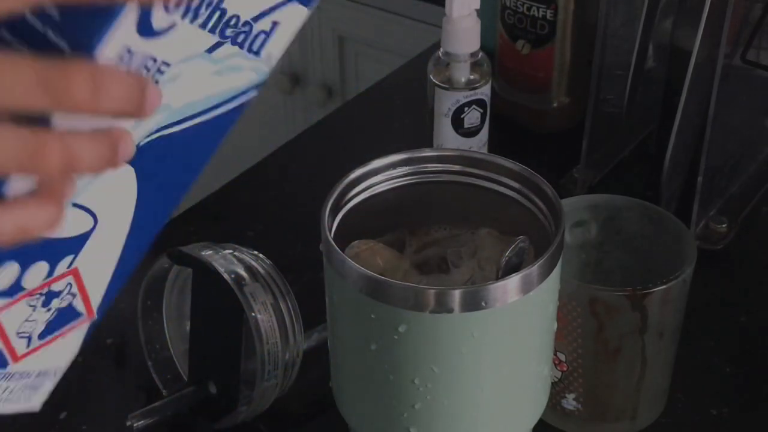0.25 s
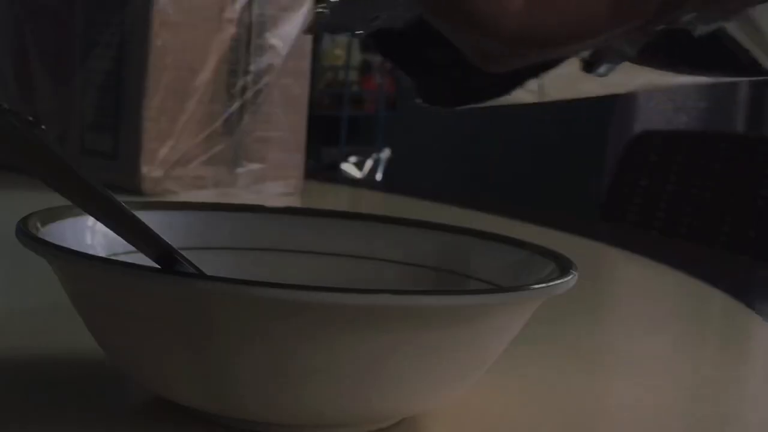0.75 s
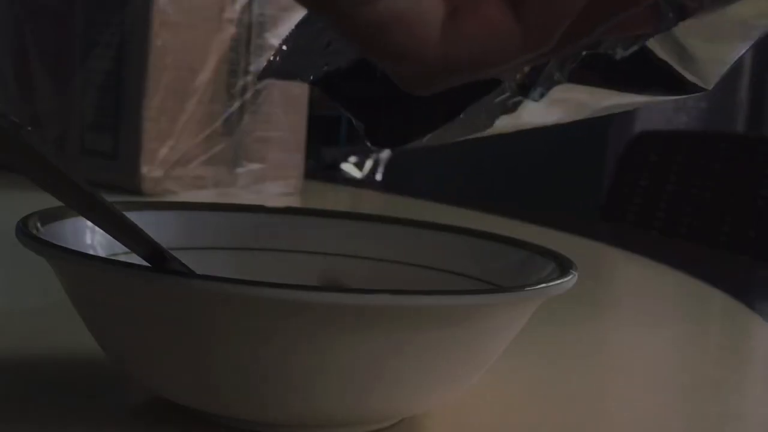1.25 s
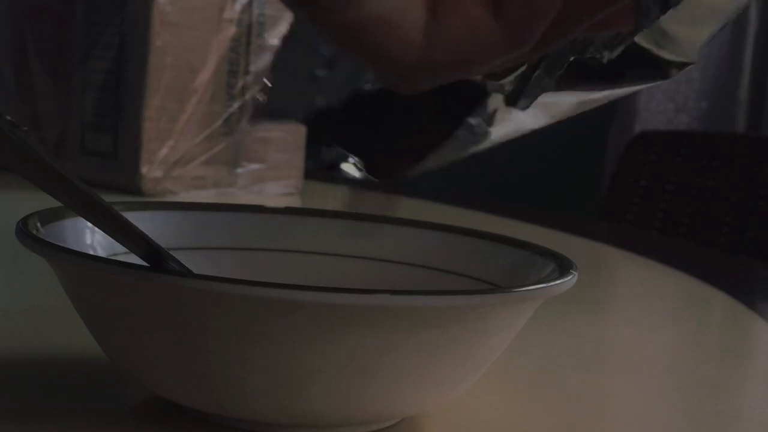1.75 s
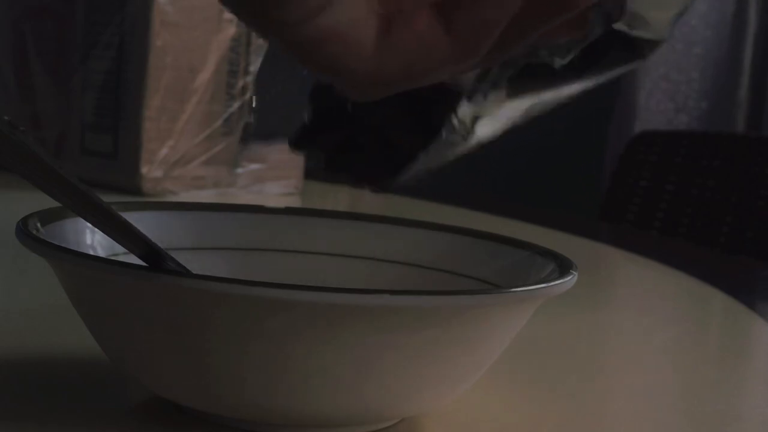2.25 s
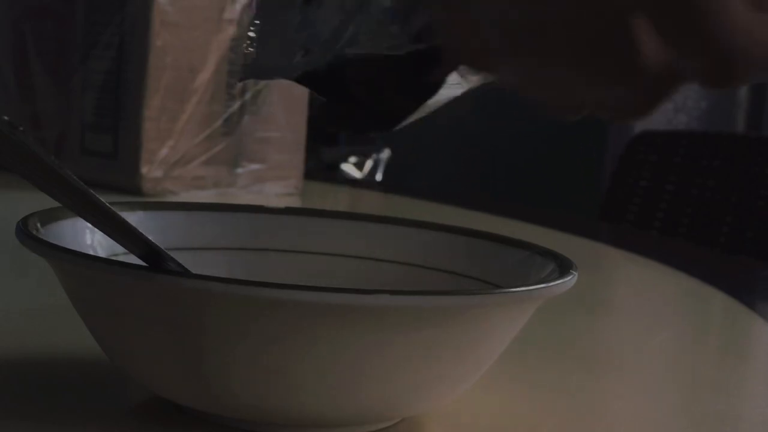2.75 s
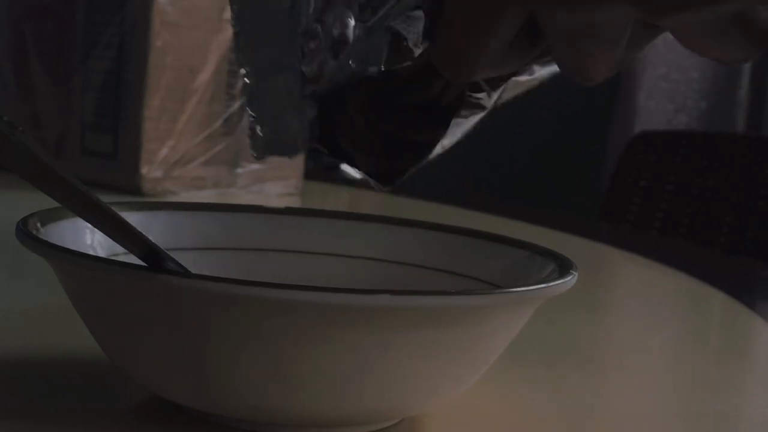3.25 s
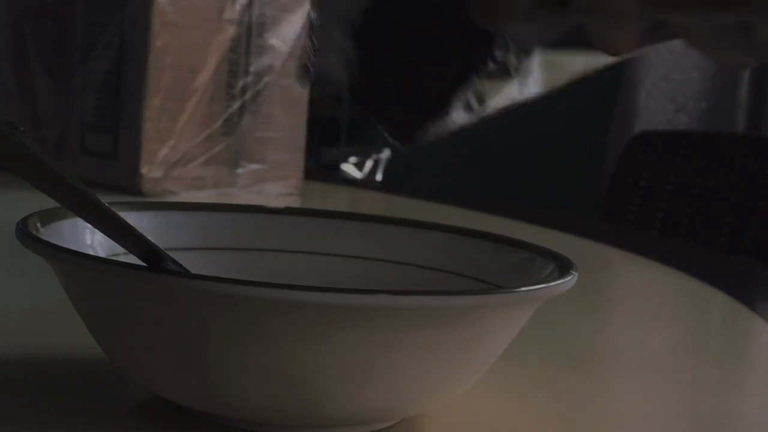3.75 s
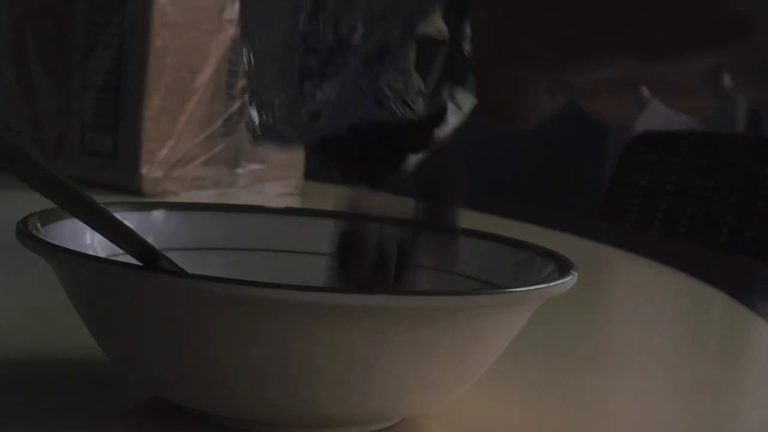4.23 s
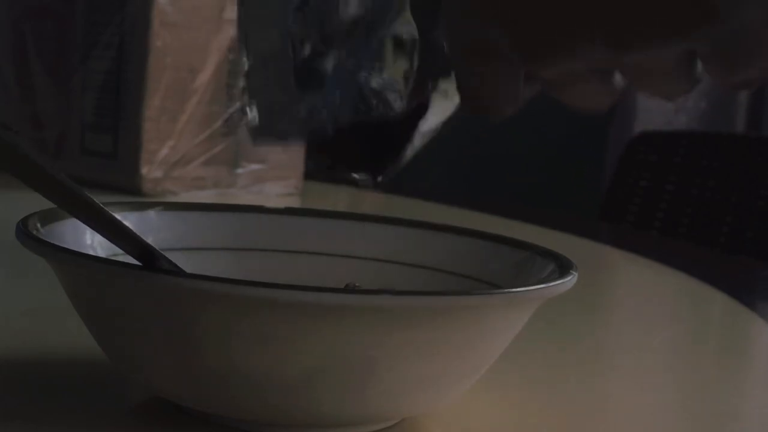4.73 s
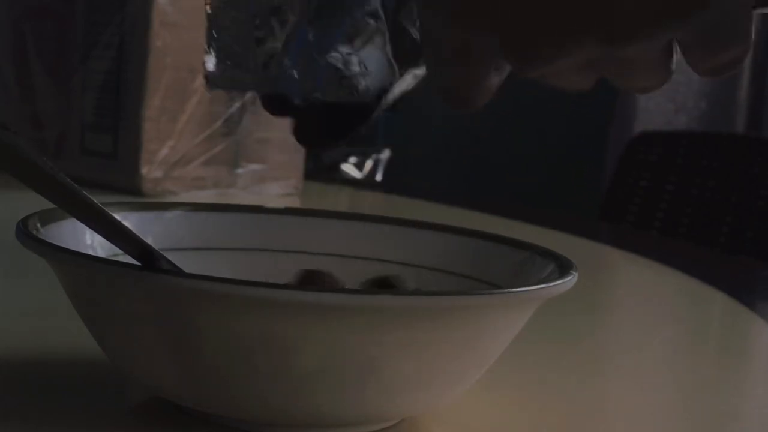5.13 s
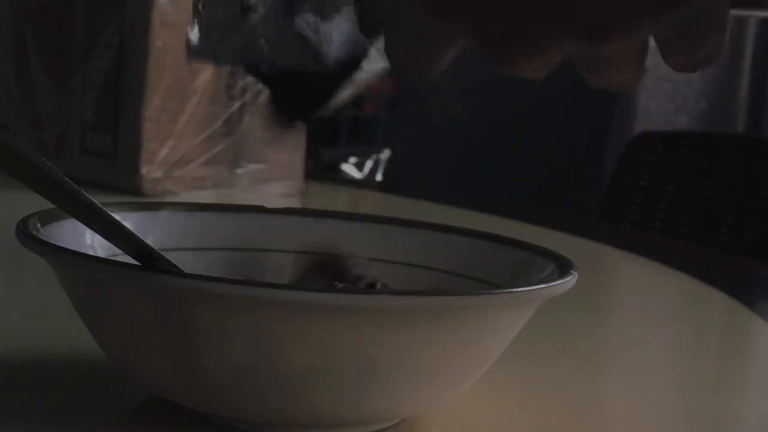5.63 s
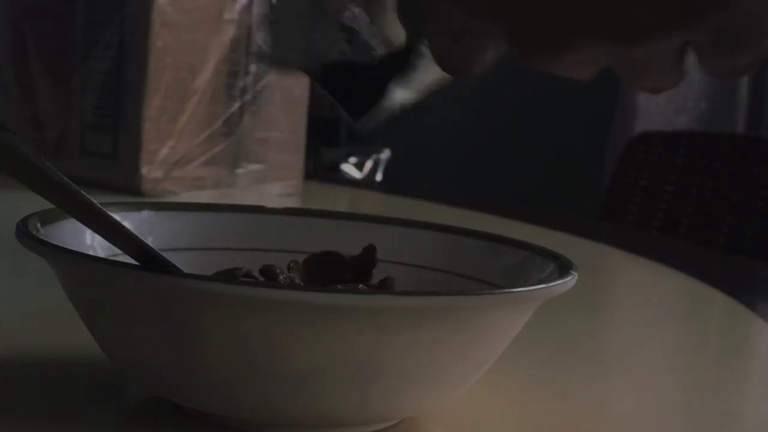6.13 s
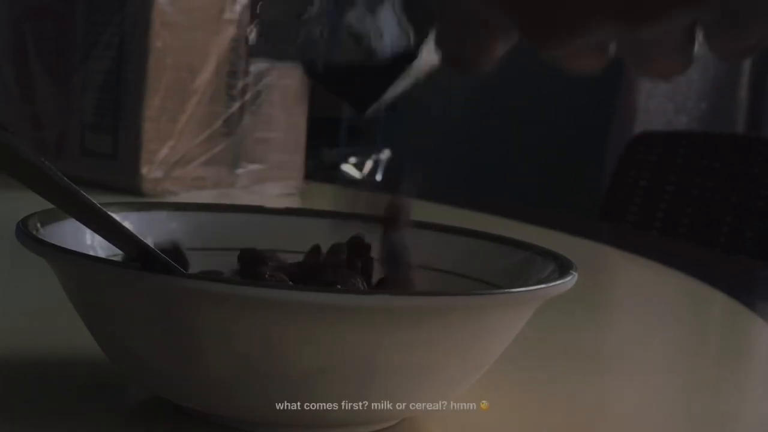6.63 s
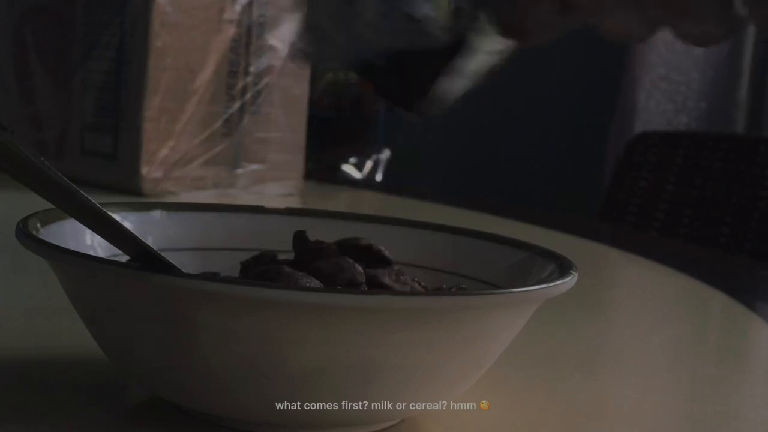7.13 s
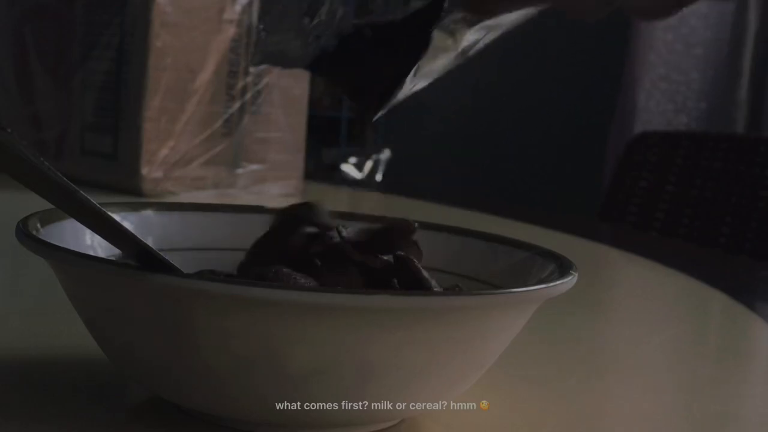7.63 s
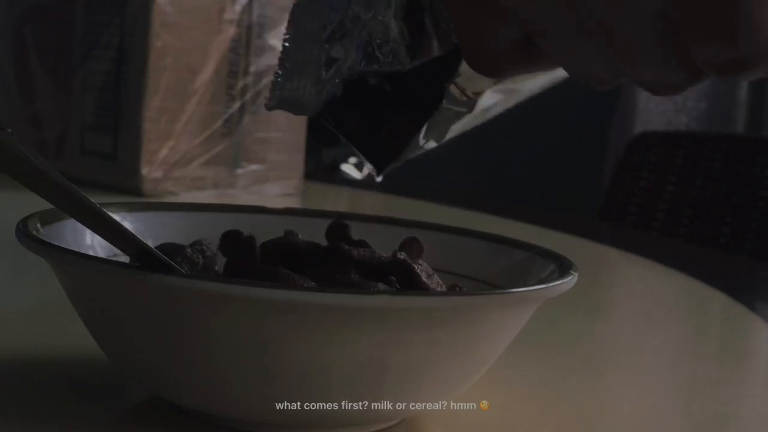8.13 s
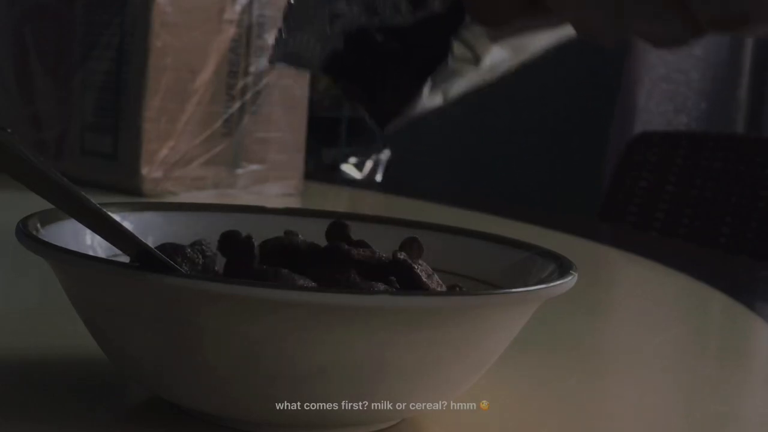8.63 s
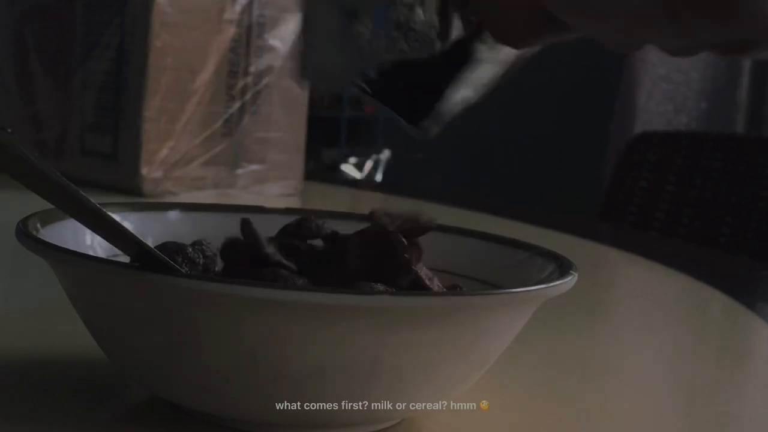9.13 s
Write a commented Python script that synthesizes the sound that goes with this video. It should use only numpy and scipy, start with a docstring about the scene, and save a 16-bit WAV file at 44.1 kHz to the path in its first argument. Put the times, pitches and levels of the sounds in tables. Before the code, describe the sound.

A container knock and small ticks on a counter open the scene. Dry cereal then clatters into an empty ceramic bowl in a short bright burst, followed by loud crinkling of the foil bag with few flakes. A longer, shaken pour follows, rattling onto a growing heap while the bowl's faint chime fades. It ends with faint bag creaks and a few last flakes. Very close microphone, small room, low hum.

```python
"""A knock and a few ticks on the counter, then dry cereal is shaken from a crinkly bag into a ceramic bowl.
Heard close by in a small humming room: flakes and creases are noise bursts, each with its own short ring.
Sliding flakes and the flexing bag are filtered noise contacts whose levels follow the shakes.
The bowl is a set of resonances driven by the flakes and the load; its faint chime weakens as the heap grows."""
import sys
import numpy as np
from scipy import signal
from scipy.fft import rfft, irfft
from scipy.io import wavfile
from scipy.ndimage import uniform_filter1d

SR = 44100
rng = np.random.default_rng(int(sys.argv[2]) if len(sys.argv) > 2 else 0)


def to_wav(s):
    """Save 16-bit WAV."""
    ch = np.atleast_2d(s).T  # columns
    pcm = np.round(np.clip(ch, -1, 1) * 32767)  # PCM
    wavfile.write(sys.argv[1], SR, pcm.astype(np.int16))


N = 413658
T = np.arange(N) / SR

# colour of the hollow body under a contact: frequency_hz, level_db
BODY_COLOUR = [(150, -20.5), (450, -17.5), (750, -5), (1050, 2.5), (1350, 5.5), (1750, -1.5), (2200, -5),
               (3000, -7.5), (5000, -48.5)]
# colour of the bright edge of a contact: frequency_hz, level_db
EDGE_COLOUR = [(6000, -44.5), (9500, -11), (11300, -1.5), (13500, -3), (15800, -4)]
USUAL_RING_HZ = 5300


def undb(db):
    """Decibels to gain."""
    return np.exp(np.asarray(db) * (np.log(10) / 20))


def unit(x):
    """Scale to rms 1."""
    return x / np.sqrt(np.mean(x ** 2) + 1e-20)


def over_time(points):
    """Straight lines in dB through the given (s, dB) points."""
    return np.interp(T, *np.transpose(points))


def response(points, size=1024):
    """Causal (minimum-phase) impulse response of unit energy with the given (Hz, dB) colour."""
    hz, db = np.transpose(points)
    grid = np.maximum(np.fft.rfftfreq(size, 1 / SR), 1)
    colour_db = np.interp(np.log(grid), np.log(hz), db)
    # folding the cepstrum forward puts all the energy after the impulse
    cepstrum = irfft(np.log(undb(colour_db)))
    cepstrum[1:size // 2] *= 2
    cepstrum[size // 2 + 1:] = 0
    h = irfft(np.exp(rfft(cepstrum)))
    return h / np.linalg.norm(h)


def through(x, h):
    """Pass a sound through an impulse response."""
    return signal.oaconvolve(x, h)[:len(x)]


def resonate(x, hz, width_hz):
    """One resonance, gain 1 at its centre."""
    hz = min(hz, SR / 2 - 2000)
    return signal.lfilter(*signal.iirpeak(hz, hz / width_hz, fs=SR), x)


def walk(rate):
    """Slow chance with a spread near 1, turning at the given rate per second."""
    knots = rng.standard_normal(int(T[-1] * rate) + 2)
    return np.interp(T * rate, np.arange(len(knots)), knots)


def tones(rows, waver_db, waver_hz):
    """Sine lines, given as (Hz, dB), that waver in level and pitch."""
    total = 0
    for hz, db in rows:
        level = undb(db + waver_db * walk(2.13))
        phase = 2 * np.pi * np.cumsum(hz + waver_hz * walk(9.8)) / SR
        total = total + level * np.sqrt(2) * np.sin(phase)
    return total


def grains(rate, spread_db):
    """Random impulses, many small and a few large, evened out over a twentieth of a second."""
    chance = rng.random(N) * SR / rate
    hit = chance < 1
    x = np.zeros(N)
    x[hit] = undb(spread_db * np.minimum(-np.log(chance[hit] + 1e-12), 4))
    return x / np.sqrt(np.abs(uniform_filter1d(x ** 2, size=2205)) + 1e-6)


def patter(rate, spread_db, decay_ms, grind=0):
    """Small contacts as noise bursts; rate (per second) may move, grind is the power of steady rubbing."""
    decay = np.exp(-2000 / (SR * decay_ms))
    power = signal.lfilter([1], [1, -decay], grains(rate, spread_db) ** 2)
    return unit(np.sqrt(power + grind * power.mean()) * rng.standard_normal(N))


def strikes(rows, crack_db, body_db, edge_db, ring_db, ring_width_hz, snap, stretch, rise_ms, bounce,
            size=2048):
    """Each contact snaps, shivers and rebounds, heard as a ringing crack, a hollow body and a bright edge."""
    # colour of the crack: frequency_hz, level_db
    crack_colour = [(1200, -33.5), (2300, 0), (3200, -3.5), (4300, 6.5), (5300, 9), (6500, 7), (7700, 7),
                    (9300, 5), (10500, -6), (14000, -38)]
    edge_db_per_octave = 3  # high-ringing contacts have a brighter edge
    colour_scatter_db = 2
    out, ms = np.zeros(N + size), np.arange(size) / SR * 1000
    body, crack, edge = response(BODY_COLOUR), response(crack_colour), response(EDGE_COLOUR)
    attack = int(.006 * SR)

    def at(x, db):
        """Set the rms of the first 6 ms."""
        return x * undb(db) / np.sqrt(np.mean(x[:attack] ** 2))

    for (s, db, body_rel, hz, decay_ms), noise in zip(rows, rng.standard_normal((len(rows), size))):
        edge_rel = edge_db_per_octave * np.log2(hz / USUAL_RING_HZ) + colour_scatter_db * noise[-3]
        fade_ms = max(stretch * decay_ms, .2)
        rebound_ms = decay_ms * (0.96 + 1.2 * abs(noise[-1]))
        # a short contact is a clean snap, a long one builds up and touches again
        shape = (1 - np.exp(-ms * 3 / (rise_ms * decay_ms))) * np.exp(-ms / fade_ms)
        rebound = bounce * np.interp(ms - rebound_ms, ms, shape, left=0)
        shiver = noise * (shape + rebound)
        shiver[0] += snap / decay_ms
        ring = at(through(shiver, crack), 0) + at(resonate(shiver, hz, ring_width_hz), ring_db)
        hit = at(ring, crack_db)
        hit = hit + at(through(shiver, body), body_rel + body_db)
        hit = hit + at(through(shiver, edge), edge_rel + edge_db)
        start = max(int(s * SR), 0)
        out[start:start + size] += undb(db) * hit
    return out[:N]


def hum():
    """Room tone: coloured noise as a low rumble, a few wavering low lines and two faint whines."""
    # colour of the rumble ahead of the low cut: frequency_hz, level_db
    room_colour = [(20, -25.5), (30, 8), (38, 0.5), (57, 0), (75, -3), (95, -3), (120, 3), (150, -9),
                   (220, -13), (400, -22), (900, -29), (2500, -35.5), (6000, -42.5), (15000, -52)]
    # course of the rumble, lowered 3 dB below: time_s, level_db
    rumble_course = [(0.0, -46), (0.44, -46.5), (0.73, -38.5), (1.12, -45), (2.61, -38.5), (4.57, -48),
                     (8.36, -43.5), (9.38, -43)]
    # low lines of the hum: frequency_hz, level_db
    hum_lines = [(57, -64.5), (111, -66.5), (123.8, -66), (167, -66.5)]
    # faint whines: start_s, end_s, partials as (frequency_hz, level_db)
    whine_rows = [(.42, .64, [(470, -70), (945, -66), (1410, -70)]), (8.4, 9.0, [(937, -72), (1895, -76)])]
    whine_fade_s = 0.048
    rumble = unit(through(rng.standard_normal(N), response(room_colour, size=16384)))
    low_cut = signal.butter(10, 31, "high", fs=SR, output="sos")
    rumble = signal.sosfilt(low_cut, rumble) * undb(over_time(rumble_course) - 3.0)
    whine = 0
    for start, end, partials in whine_rows:
        fade = np.clip(np.minimum(T - start, end - T) / whine_fade_s, 0, 1)
        whine = whine + tones(partials, waver_db=2.5, waver_hz=6) * fade
    return rumble + tones(hum_lines, waver_db=3.0, waver_hz=1.48) + whine


def room(x, wet_db, t60_s, treble_t60_s, table_db, table_ms):
    """Quick scatter off bowl and table, with the short tail of the walls; treble has its own decay."""
    t = T[:SR]
    low, high, near = rng.standard_normal((3, SR))
    low = signal.lfilter(*signal.butter(2, 3500, fs=SR), low)
    high = signal.lfilter(*signal.butter(2, 3500, "high", fs=SR), high)
    tail = low * undb(-60 * t / t60_s) + high * undb(-60 * t / treble_t60_s)
    tail *= t > .006
    near *= np.exp(-t * 1000 / table_ms) * (t > .002)
    walls = undb(wet_db) * tail / np.linalg.norm(tail)
    table = undb(table_db) * near / np.linalg.norm(near)
    return x + through(x, walls + table)


def vessel():
    """A container on the counter rings out from time zero, with the first knock: decaying, wavering sines."""
    # modes of the container: frequency_hz, level_db, t60_s
    vessel_modes = [(796, -40, 0.23), (826, -39, 0.22), (1010, -57, 0.3), (1292, -61, 0.26),
                    (2150, -48, 0.27), (3025, -52, .2)]
    total = 0
    for hz, db, t60 in vessel_modes:
        fade = undb(db - 60 * np.minimum(T / t60, 3))
        total = total + fade * np.sin(2 * np.pi * hz * T + 2.1 * walk(83))
    return total


def counter_knocks():
    """Things handled on the counter: a knock and ticks with a strong, broad ring."""
    # start_s, nominal level_db, relative body_db, ring_hz, nominal decay_ms (shortened by stretch)
    knock_rows = [(.001, -35, 11, 2800, 7), (.497, -52, 5, 3600, 3), (.5137, -36, -3, 3380, 3.2),
                  (.59, -51, 6.5, 2300, 5), (.657, -37, -0.5, 4350, 2.3)]
    return strikes(knock_rows, crack_db=3.5, body_db=-3, edge_db=-7, ring_db=9.5, ring_width_hz=620,
                   snap=2.4, stretch=0.54, rise_ms=0.46, bounce=0.13)


def thumps(decay_ms, rise_ms, width_hz, size=4096):
    """Dull blows: short noise pushes, each through one broad low resonance twice."""
    # soft thumps, mostly of the load on bag wall and heap: start_s, level_db (peak, raised 9.5 dB), pitch_hz
    thump_rows = [(.004, -40, 269), (.513, -45, 330), (1.628, -45, 170), (2.584, -41, 178),
                  (2.966, -40, 600), (3.206, -36, 285), (3.267, -39, 277), (3.295, -41, 277),
                  (3.377, -39, 316), (3.767, -36, 590), (4.721, -44, 277), (5.106, -36, 614),
                  (5.624, -36.5, 540), (6.223, -39, 194), (6.727, -37.5, 387), (7.25, -46, 480)]
    out, ms = np.zeros(N + size), np.arange(size) / SR * 1000
    for (s, db, hz), noise in zip(thump_rows, rng.standard_normal((len(thump_rows), size))):
        push = noise * (1 - np.exp(-ms / rise_ms)) * np.exp(-ms / decay_ms)
        blow = resonate(resonate(push, hz, width_hz), hz, width_hz)
        start = max(int(s * SR), 0)
        out[start:start + size] += undb(db + 9.5) * blow / np.abs(blow).max()
    return out[:N]


def snapping_creases():
    """Creases of the bag snap over: brief cracks with a weak rebound."""
    # loudest creases: start_s, nominal level_db, relative body_db, ring_hz, nominal decay_ms (shortened)
    crease_rows = [(1.4715, -23, -16, 5700, 8.9), (1.572, -32.5, -16, 5800, 1.3),
                   (1.6437, -32.5, -2, 5920, 0.97), (1.787, -31.5, -6, 9900, 0.94),
                   (1.9734, -39, 6, 8100, 1.2), (2.4797, -31.5, -20, 8550, 1),
                   (2.6169, -27.5, 1.5, 6420, 1.3), (2.682, -32, 6, 3340, 2.4),
                   (2.7507, -18, -8.5, 4330, 1.8), (2.7749, -27.5, -4, 4180, 2.5),
                   (2.802, -20, -9, 9100, 3), (2.8536, -29, -4, 6200, 1.9), (3.0521, -32, -11, 4310, 1.1),
                   (3.0607, -31, -2, 8480, 1.6), (3.1505, -18, -11, 4500, 2.7),
                   (3.2081, -19.5, -16, 2980, 2.5), (3.299, -24, -2.5, 8900, 0.85),
                   (3.3797, -25, 2.5, 3730, 0.62), (3.3937, -24.5, -9.5, 4370, 2.1),
                   (3.4046, -23, -6, 6800, 3.1), (3.4793, -28.5, -20, 5070, 2.4),
                   (3.5012, -28.5, -20, 6400, 3), (3.515, -26.5, -15, 5660, 1.6),
                   (3.7228, -31.5, 7, 8760, 2.1), (3.7544, -21.5, 4, 5500, 0.94),
                   (3.7712, -20.5, 0, 4360, 1.1), (3.8911, -25, -4, 4050, 9.3),
                   (3.8965, -28, -11, 9300, .7), (4.4633, -29, -9, 10000, 1.04),
                   (4.558, -38.5, -22, 10400, 1.7), (4.6617, -36.5, 2, 5370, 3.8),
                   (4.6975, -33, -11, 4600, 11), (4.8287, -34.5, -2.5, 4500, 0.73),
                   (7.0845, -35, -12.5, 9000, .9), (7.4293, -31, -16, 7840, 1.9),
                   (8.0805, -45, -7, 4970, 0.76), (8.313, -53, 4, 5920, 2.4), (8.3407, -56, 14, 9000, 1.2),
                   (8.379, -46, -4, 7800, 1.9), (8.4045, -48, -5, 8000, 4.4), (8.4825, -53, -5, 8700, 1.8),
                   (8.5365, -43, -20, 7600, 1.1), (8.7586, -43.5, -9, 7400, 1.3)]
    return strikes(crease_rows, crack_db=1.0, body_db=-2.5, edge_db=-2.0, ring_db=-1.0, ring_width_hz=330,
                   snap=1.2, stretch=0.6, rise_ms=0.28, bounce=0.24)


def shaking():
    """Flow, rattle and flexing in dB: each shake rises, holds and settles, over a slow creep."""
    # shakes of the bag, nominal levels: start_s, length_s, flow_db, hollow rattle_db, flex_db
    shake_rows = [(0.646, .07, -38.5, -44.5, -44), (0.787, 0.18, -32.5, -40.5, -44.5),
                  (0.939, 0.29, -22, -32.5, -50.5), (1.272, .13, -30, -39, -47.5),
                  (1.605, 0.2, -41, -44, -43.5), (1.811, 0.16, -29, -35.5, -44),
                  (2.057, 0.075, -36, -40.5, -58), (2.215, 0.25, -43.5, -45, -46),
                  (2.512, .1, -34.5, -36.5, -45), (2.754, 0.18, -32, -38.5, -48),
                  (3.004, 0.16, -38, -41, -44.5), (3.136, 0.11, -29, -32.5, -41.5),
                  (3.387, 0.18, -36.5, -40.5, -45), (3.607, 0.12, -40.5, -41, -48),
                  (3.69, 0.092, -33, -33.5, -39.5), (3.857, 0.048, -31.5, -32.5, -46),
                  (3.959, 0.41, -27.5, -34.5, -52), (4.43, 0.027, -38, -37.5, -51),
                  (4.677, .07, -38, -36, -41.5), (4.797, .15, -42.5, -44, -44.5),
                  (4.941, 0.099, -27.5, -31.5, -42), (5.1, 0.51, -37, -39.5, -49),
                  (5.428, .42, -28, -32.5, -51), (5.892, 0.11, -35, -38.5, -62),
                  (6.13, 0.086, -41.5, -39, -46), (6.212, 0.14, -31.5, -35, -41),
                  (6.433, 0.043, -28.5, -31.5, -45), (6.551, 0.18, -40, -37.5, -46.5),
                  (6.635, 0.23, -30.5, -37, -45.5), (7.007, 0.25, -40, -41, -48),
                  (7.263, 0.059, -37.5, -45, -61), (7.424, 0.067, -40, -41, -53.5),
                  (7.494, 0.092, -30.5, -36.5, -49), (7.72, 0.16, -41, -42.5, -58),
                  (8.3, 0.18, -66, -58, -41.5), (8.716, 0.27, -59.5, -66, -64),
                  (8.895, 0.093, -45.5, -51, -42.5), (9.067, 0.18, -40, -41, -48.5),
                  (9.3, .04, -47.5, -52, -46)]
    # the load creeping while the bag is tipped: start_s, end_s, flow_db, hollow rattle_db, flex_db
    creep = (1.3, 8, -44, -48, -54)
    attack_s, settle_s = .016, .17

    def swell(start_s, end_s, t):
        """Straight rise, hold, and a curved settling after the end."""
        rise = np.clip((t - start_s) / attack_s, 0, 1)
        return rise * np.clip(1 - (t - end_s) / settle_s, 0, 1) ** 2

    t = T[::64]
    gains = np.outer(undb(creep[2:]), swell(*creep[:2], t)) + 1e-6
    for s, length_s, *levels_db in shake_rows:
        gains = np.maximum(gains, np.outer(undb(levels_db), swell(s, s + length_s, t)))
    return [np.interp(T, t, 20 * np.log10(gain)) for gain in gains]


def sliding(flow_db, rattle_db, flex_db):
    """Flakes grind and tumble in the bag while its wall buckles softly."""
    # colour of flakes sliding: frequency_hz, level_db
    slide_colour = [(1200, -26.5), (2300, -21), (3300, -0.5), (4400, 3), (5300, 2.5), (6600, 2), (7700, -2),
                    (9300, -1), (10300, -7.5), (11500, -2), (13500, -7.5), (15800, -12.5)]
    # colour of the flexing wall: frequency_hz, level_db
    flex_colour = [(70, -29.5), (160, -4.5), (280, 3.5), (450, -1.5), (650, 2), (1000, -4), (2000, -40.5)]
    # hollow ring of a thick stream leaving the bag, raised 7.5 dB below: time_s, level_db
    stream_course = [(.7, -0.5), (3.0, -49.5), (4.5, -20), (4.95, 2.5), (5.8, 2.5), (6.2, -1), (6.6, -10),
                     (8.9, -14)]
    # fine treble ticking of the film: time_s, level_db relative to the flow
    wrinkle_course = [(1, -19), (4.5, -17), (5.3, -1), (6.4, -6.5), (7.2, 3), (7.7, -4.5), (9.3, -11)]
    # flakes touching, large to small: pitch_hz, width_hz, level_db (raised 0.5 dB below)
    size_rows = [(1300, 630, -9), (2360, 440, -5), (3270, 290, -2), (4110, 490, 1.5), (5440, 790, 3),
                 (7370, 1300, -0.5), (9400, 1300, -5)]
    usual_flow_db = -38.5
    # a faster flow means more contacts a second
    pace = undb(0.7 * (np.maximum(flow_db, -60) - usual_flow_db))
    contacts = patter(rate=520 * pace, spread_db=4, decay_ms=1.1, grind=.05)
    tumbles = patter(rate=220 * pace, spread_db=4.5, decay_ms=2.0)
    # tiny wrinkles of the film tick at their own moments, above the flakes
    ticks = patter(rate=140, spread_db=10, decay_ms=.6)
    wrinkles = through(ticks, response(EDGE_COLOUR)) * undb(over_time(wrinkle_course))
    hollow = resonate(contacts, 3130, 1000) * undb(over_time(stream_course) + 7.5)
    # flakes of different sizes click at their own pitch and their own moments
    clicks = 0
    for hz, width_hz, db in size_rows:
        touches = patter(rate=90 * pace, spread_db=4.2, decay_ms=1.0)
        clicks = clicks + undb(db + 0.5) * resonate(touches, hz, width_hz)
    grinding = undb(-1) * through(contacts, response(slide_colour))
    crackle = (grinding + clicks + hollow + wrinkles) * undb(flow_db - 5.5)
    rattle = unit(through(0.88 * contacts + tumbles, response(BODY_COLOUR))) * undb(rattle_db - 4.0)
    buckles = patter(rate=250, spread_db=4.0, decay_ms=4.0)
    flex = unit(through(buckles, response(flex_colour, size=4096)))
    # the flexing fades out where the rattle is weak
    moving = np.clip(undb(rattle_db + 40.5), 0, 1)
    return crackle + rattle + moving * flex * undb(flex_db - 2.0)


def bowl(contacts, empty_db, full_db):
    """The ceramic's modes ring under the contacts, at a level that falls as the bowl fills."""
    # modes of the bowl: frequency_hz, relative level_db, t60_s
    bowl_modes = [(795, -9, 0.36), (1737, -4, 0.057), (1825, 1.5, 0.079), (2313, 0, 0.04), (2435, -1, 0.2),
                  (4400, -1.5, 0.084), (4970, -9.5, 0.079), (5380, -5.5, 0.11), (5230, -4.5, 0.13),
                  (6250, -10.5, .12), (7570, 6.5, .14), (7040, -7, .12), (8000, -14.5, 0.21)]
    ring = 0
    for hz, db, t60 in bowl_modes:
        width_hz = np.log(1000) / np.pi / t60
        ring = ring + undb(db) * resonate(contacts, hz, width_hz)
    return ring * undb(np.interp(T, [1.6, 7], [empty_db, full_db]))


def strays(flow_db, rattle_db, above_db, hollow_db, decay_ms, count=130):
    """Rows for the lesser flakes: they land at random, as hard as the stream is strong."""
    when, pitch, length = rng.random((count, 3)).T
    s = (np.arange(count) + when) / count * T[-1]
    db = np.interp(s, T, flow_db) + above_db
    body_db = np.interp(s, T, rattle_db - flow_db) + hollow_db
    ring_hz = USUAL_RING_HZ * 2 ** (1.7 * (pitch - .5))
    return np.column_stack([s, db, body_db, ring_hz, decay_ms * (.5 + length)])


def landing_flakes(flow_db, rattle_db):
    """Flakes land one by one, each a sharp snap with a short ring and a clear rebound."""
    # loudest flakes: start_s, nominal level_db, relative body_db, ring_hz, decay_ms
    flake_rows = [(.8201, -18, -15, 5650, 2.8), (.8276, -18, -7, 4900, 0.67), (.8653, -27, -10, 7400, 4.5),
                  (.9301, -23, -7, 5490, 2.8), (.959, -16, -8, 5500, 1.6), (.9674, -15.5, -8.5, 7400, 5.7),
                  (1.0181, -18, -11, 5300, 2.5), (1.0491, -18, -10, 7200, 12),
                  (1.1296, -20.5, -9, 5530, 7.4), (1.1419, -18.5, -13, 5730, 2.8),
                  (1.2312, -19, -15, 4160, 2.9), (1.2998, -12, -12.5, 5240, 2.4),
                  (1.8443, -34, 1, 7400, 4.1), (1.851, -18, -17, 6900, 1.3),
                  (1.8652, -13.5, -7.5, 6900, 2.95), (2.0742, -26.5, -9, 7300, 1.1),
                  (2.0798, -21, -10.5, 6600, 2), (2.2648, -25, -11, 5200, 1.26),
                  (2.3026, -32, -9, 5500, 3.5), (3.9571, -14.5, -7.5, 5330, 6.8),
                  (3.9714, -13, -11.5, 5150, 1.8), (3.9869, -21, -6, 5060, 3.7),
                  (4.0407, -23.5, 0.5, 5800, 1.3), (4.1072, -19.5, -8.5, 5900, 3.9),
                  (4.1463, -19, -13, 7400, 1.5), (4.1728, -17, -8, 5350, 8.2),
                  (4.2096, -21.5, -5, 6200, 1.7), (4.257, -24.5, -8, 5300, 9.9),
                  (4.3027, -18, -11, 5140, 4.8), (4.9602, -23, -4.5, 4540, 7.3),
                  (4.9855, -20, -19, 7550, 4.8), (5.0886, -15.5, -20, 4270, 0.64),
                  (5.0997, -21.5, -19, 2780, 1.9), (5.1663, -23, -7, 3220, 2.6),
                  (5.187, -22, -11, 6960, 2.6), (5.2827, -27, -7.5, 4090, 2.8),
                  (5.3383, -26.5, -6, 8900, 10.5), (5.4117, -23.5, -5, 3270, 1.9),
                  (5.457, -20, -6, 4050, 1.9), (5.5337, -22, -5, 4200, 3.4), (5.6268, -21, -9, 6560, 2),
                  (5.6758, -21, -5, 7850, 1.8), (5.7574, -19.5, -11, 6900, 3.8),
                  (5.778, -21, -9, 4300, 9.6), (5.8269, -23, -4.5, 7460, 1.7),
                  (5.8606, -23, -15, 4300, 1.9), (5.9098, -21.5, -9, 5200, 7.7),
                  (5.931, -20, -9, 7300, 1.6), (6.0399, -29.5, -11, 7700, 1.5),
                  (6.1348, -25, -7.5, 4360, 1.26), (6.2239, -29.5, 5.5, 5700, 1.95),
                  (6.2566, -36, 9.5, 5750, 1.9), (6.2776, -27.5, -2, 4280, 2.3),
                  (6.3696, -19.5, -10.5, 5560, 2.1), (6.3822, -25, -2.5, 5340, 2.8),
                  (6.684, -21, -5.5, 5170, 3.2), (6.7273, -28, -6, 6830, 4), (7.0335, -24.5, -5, 3320, 2),
                  (7.0515, -27.5, -4, 4220, 1.3), (7.1243, -17.5, -11, 7430, 6.2),
                  (7.2008, -26, -5, 3560, 2), (7.2706, -18.5, -18, 5300, 3.9),
                  (7.2893, -17.5, -19, 5200, 1.9), (7.3293, -25.5, -17, 5300, 1.2),
                  (7.4546, -28, -14, 8300, 4.5), (7.4996, -26, -9.5, 6540, 3.6),
                  (7.5565, -29.5, 3.5, 7000, 2.9), (7.7284, -38, -2, 4330, 2.1),
                  (7.7599, -31, -7.5, 7800, 3.4), (7.8147, -35, -9, 6000, .7),
                  (7.825, -29.5, -4, 4300, 2.2), (7.908, -39, 0, 6480, 1.5), (7.9786, -37, -4, 6000, 2.5),
                  (8.9276, -41.5, 4, 6010, 4.3), (8.9943, -39, 5.5, 4600, 1.2),
                  (9.1357, -33.5, -0.5, 4440, 3.9), (9.3043, -38, 0.5, 4200, .8)]
    lesser = strays(flow_db, rattle_db, above_db=1.5, hollow_db=-2.5, decay_ms=1.5)
    return strikes(np.vstack([flake_rows, lesser]), crack_db=-0.85, body_db=-1.63, edge_db=-6, ring_db=-1.5,
                   ring_width_hz=380, snap=4.8, stretch=1.0, rise_ms=0.16, bounce=0.48)


def scene():
    """The pour, the bag and the bowl in the room."""
    flow_db, rattle_db, flex_db = shaking()
    surge_db, surge_hz = 1.2, 14
    flow_db = flow_db + surge_db * walk(surge_hz)
    handling = counter_knocks() + vessel() + thumps(decay_ms=3, rise_ms=5.1, width_hz=320)
    load = sliding(flow_db, rattle_db, flex_db)
    flakes = landing_flakes(flow_db, rattle_db)
    close = handling + snapping_creases() + load + flakes
    close = close + bowl(flakes + load, empty_db=4.5, full_db=-13.5)
    heard = room(close, wet_db=-13.5, t60_s=.42, treble_t60_s=.27, table_db=-19.5, table_ms=7.6)
    return (heard + hum())[None]


def record(dry):
    """The highest peaks are held within +/-0.85 and the top above 15.9 kHz is cut."""
    top_cut = signal.ellip(10, .2, 70, 15900, fs=SR, output="sos")
    return signal.sosfilt(top_cut, np.clip(dry, -.85, .85))


dry = scene()
out = record(dry)
to_wav(out)
```